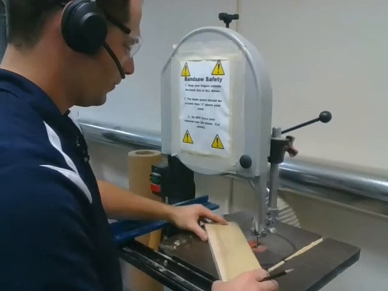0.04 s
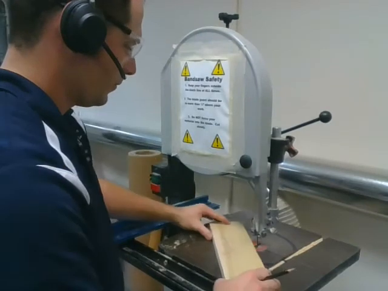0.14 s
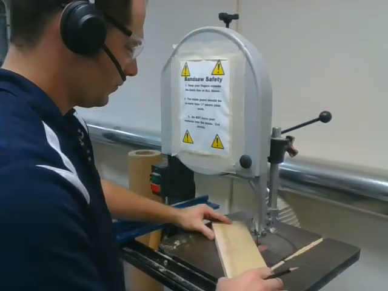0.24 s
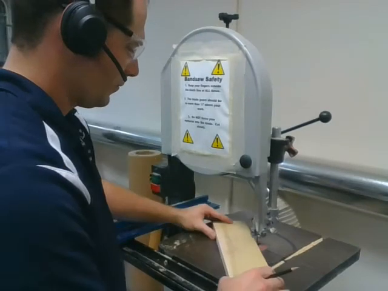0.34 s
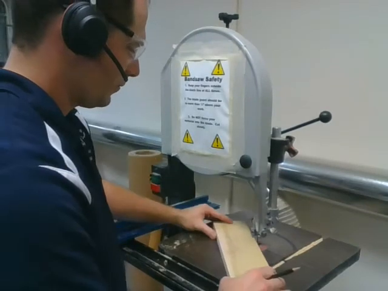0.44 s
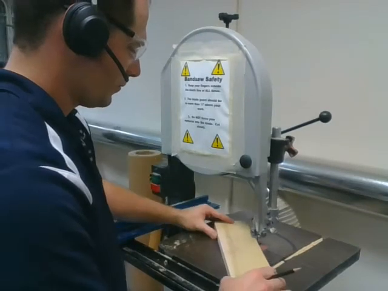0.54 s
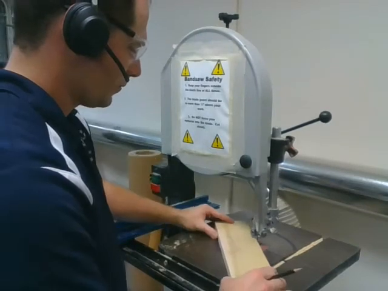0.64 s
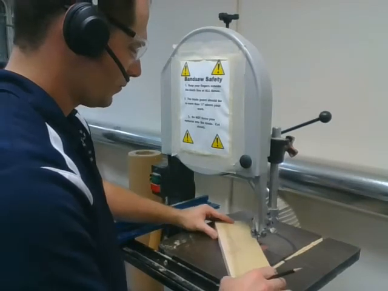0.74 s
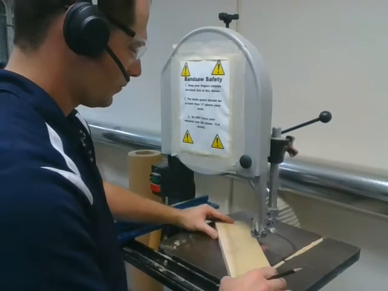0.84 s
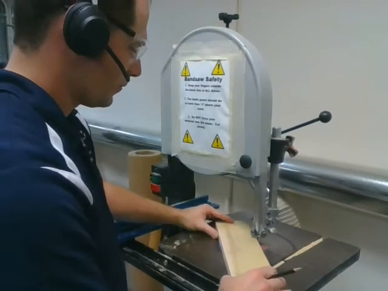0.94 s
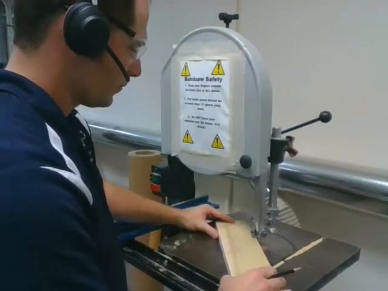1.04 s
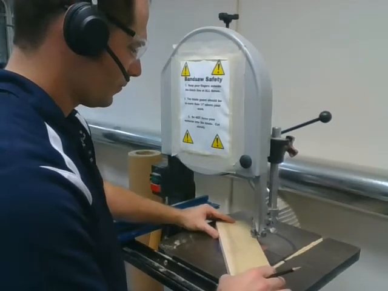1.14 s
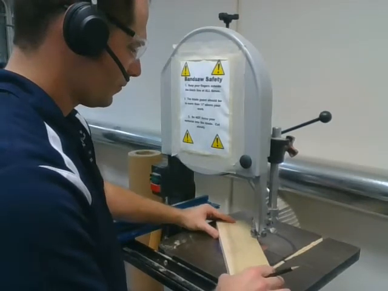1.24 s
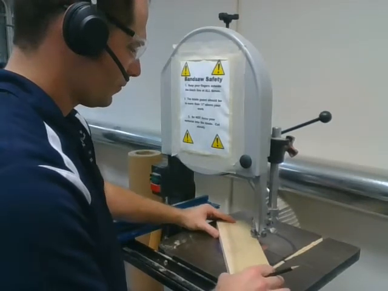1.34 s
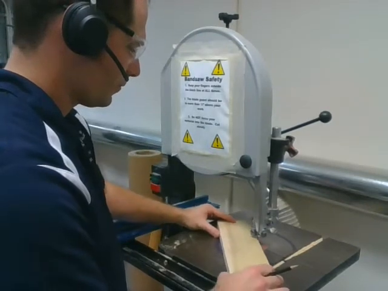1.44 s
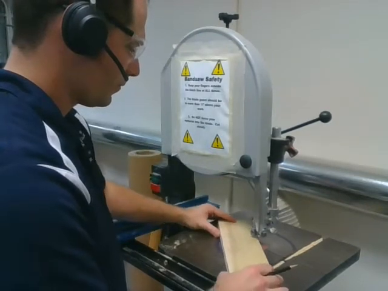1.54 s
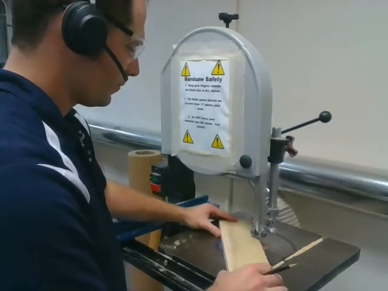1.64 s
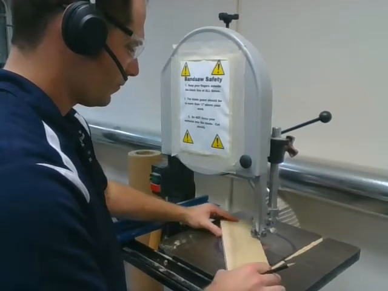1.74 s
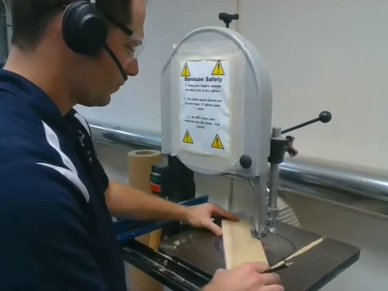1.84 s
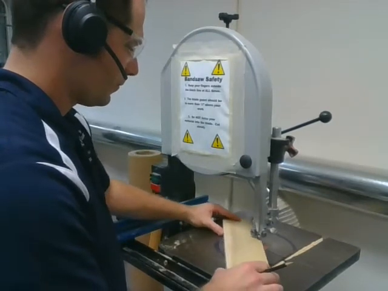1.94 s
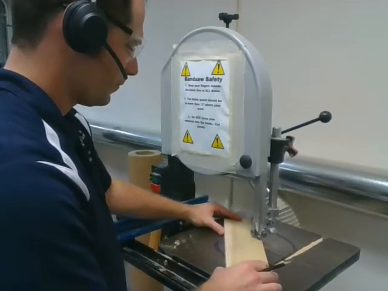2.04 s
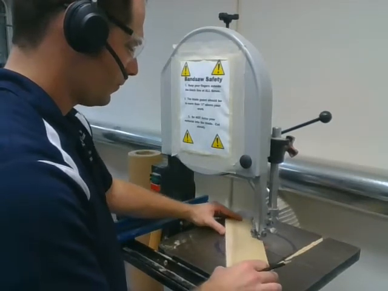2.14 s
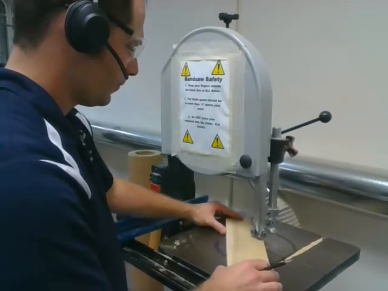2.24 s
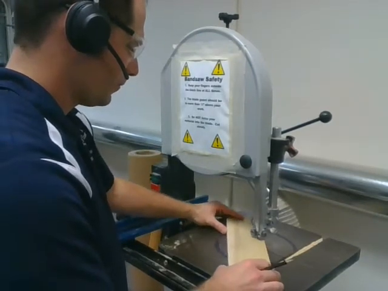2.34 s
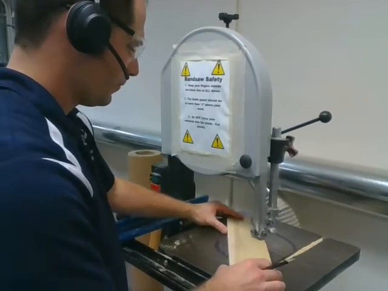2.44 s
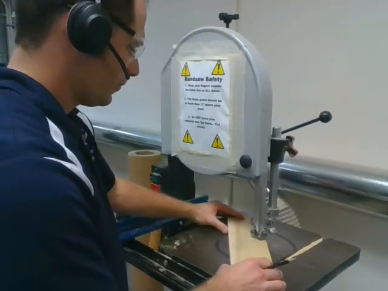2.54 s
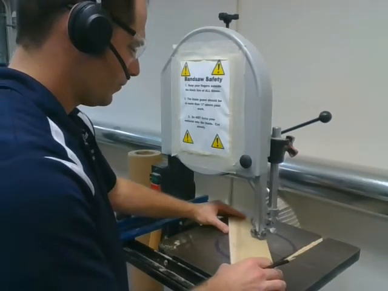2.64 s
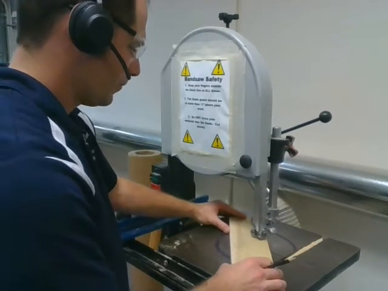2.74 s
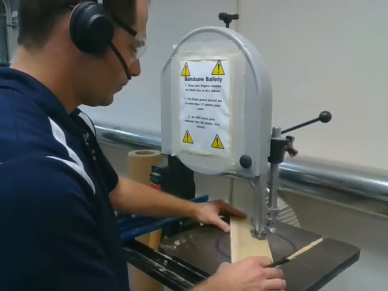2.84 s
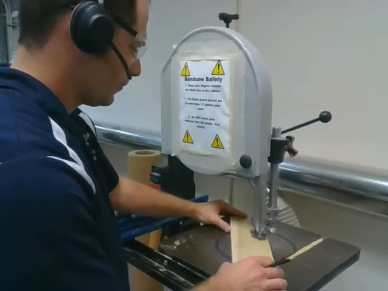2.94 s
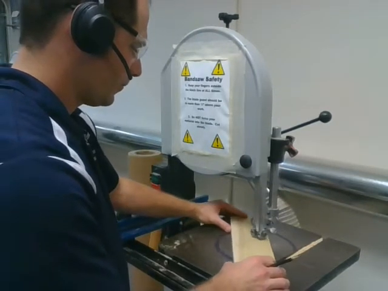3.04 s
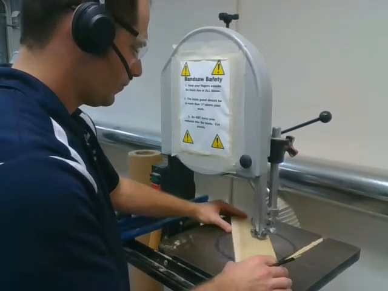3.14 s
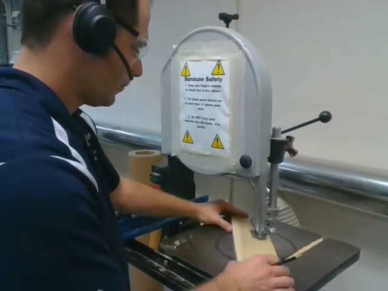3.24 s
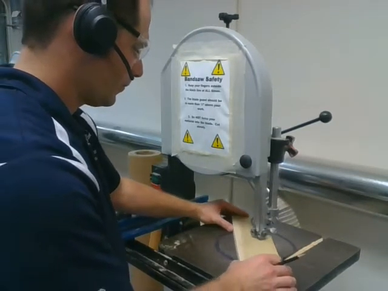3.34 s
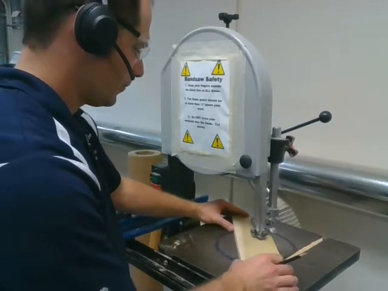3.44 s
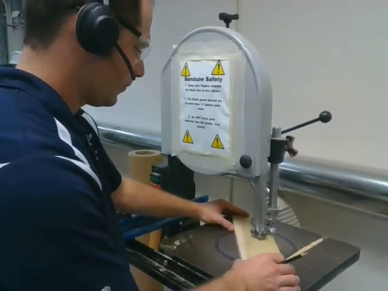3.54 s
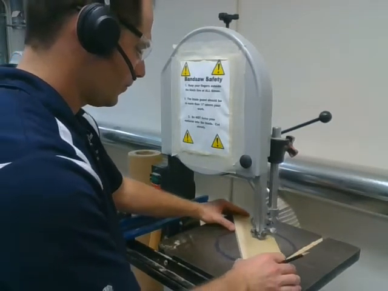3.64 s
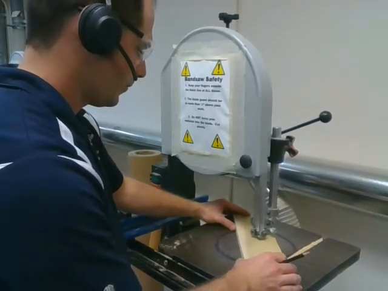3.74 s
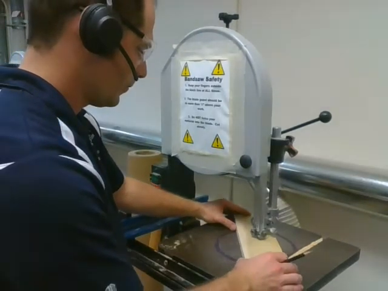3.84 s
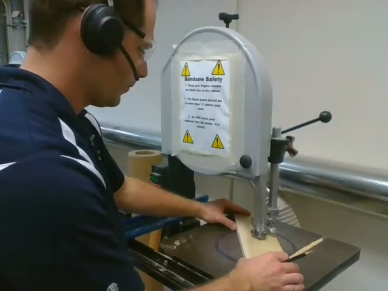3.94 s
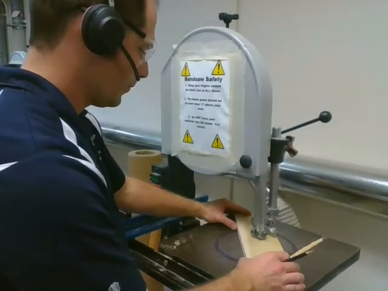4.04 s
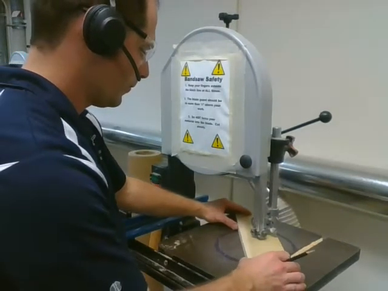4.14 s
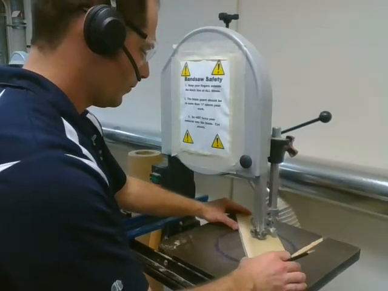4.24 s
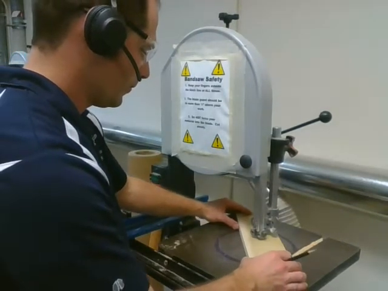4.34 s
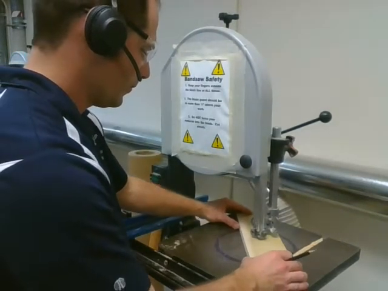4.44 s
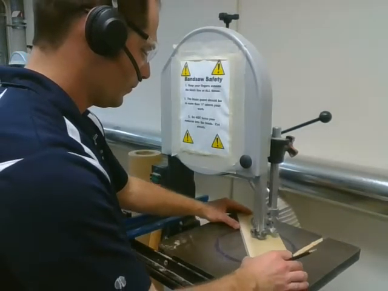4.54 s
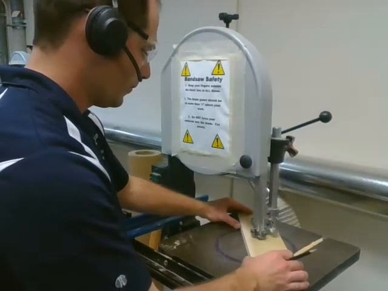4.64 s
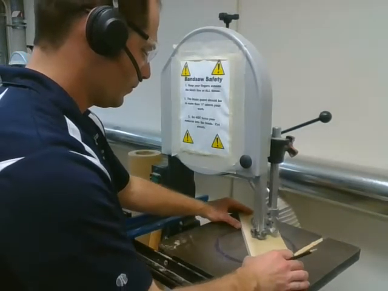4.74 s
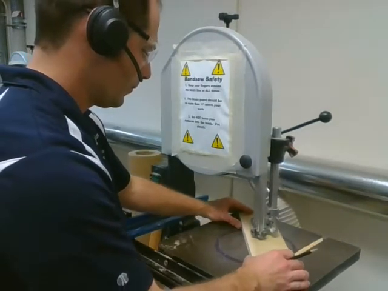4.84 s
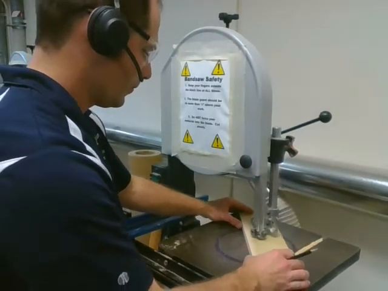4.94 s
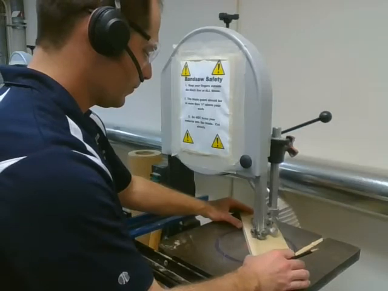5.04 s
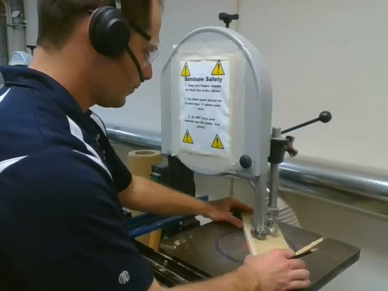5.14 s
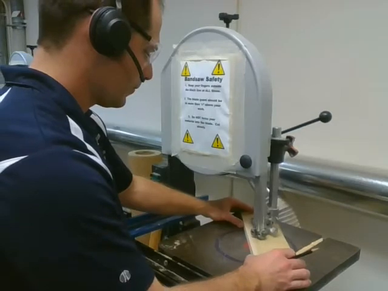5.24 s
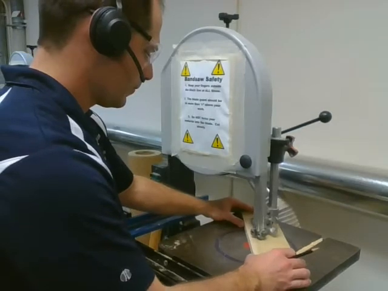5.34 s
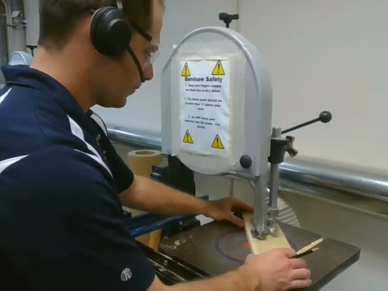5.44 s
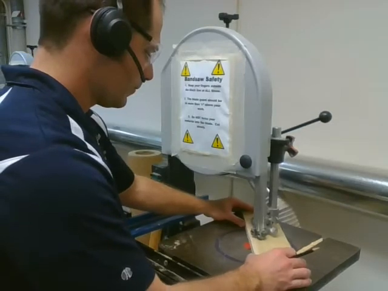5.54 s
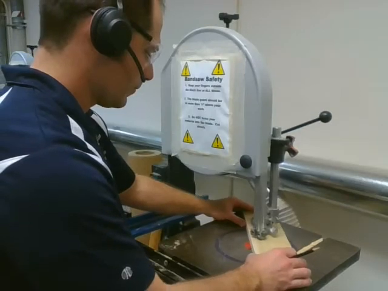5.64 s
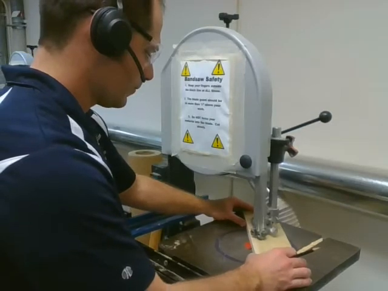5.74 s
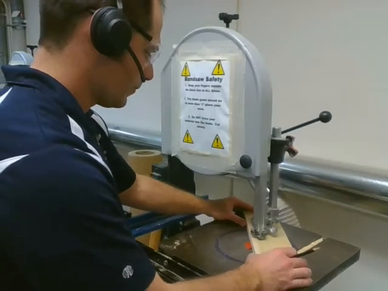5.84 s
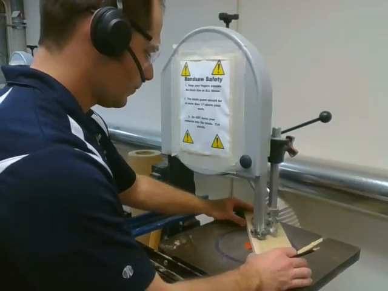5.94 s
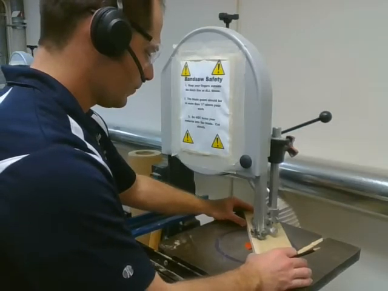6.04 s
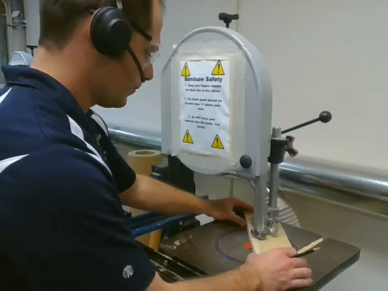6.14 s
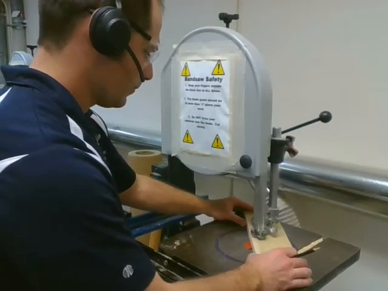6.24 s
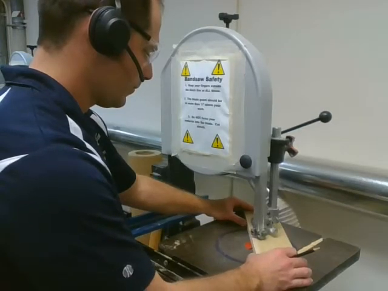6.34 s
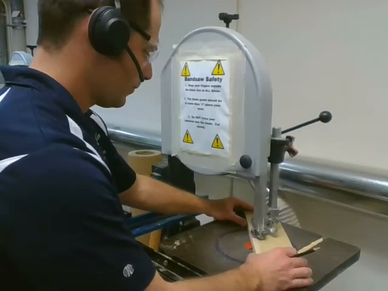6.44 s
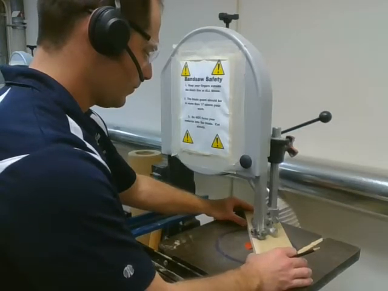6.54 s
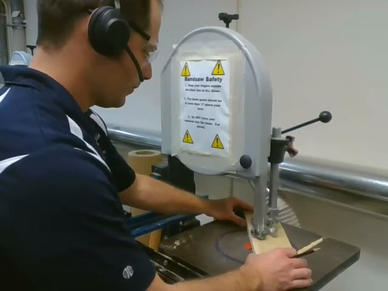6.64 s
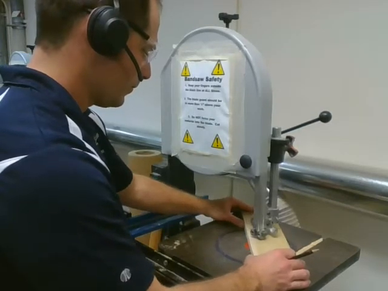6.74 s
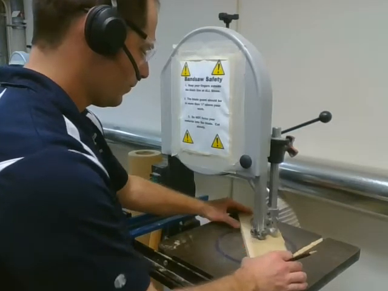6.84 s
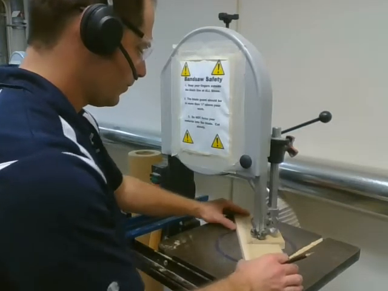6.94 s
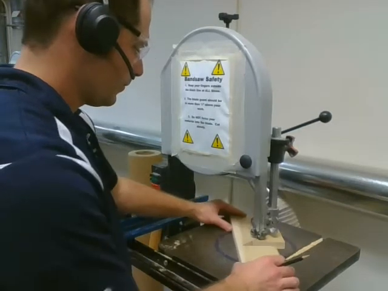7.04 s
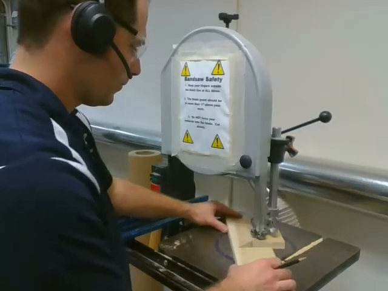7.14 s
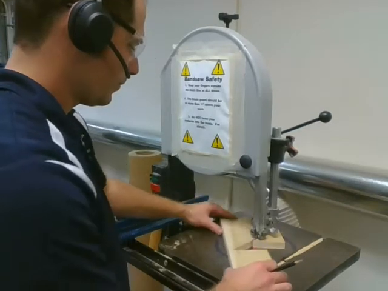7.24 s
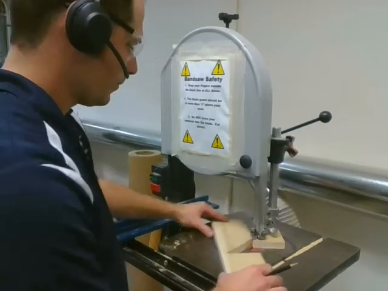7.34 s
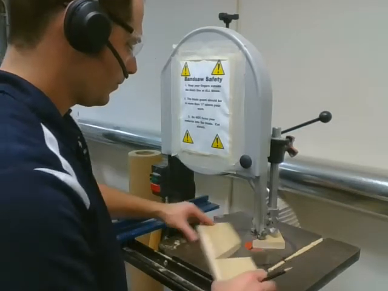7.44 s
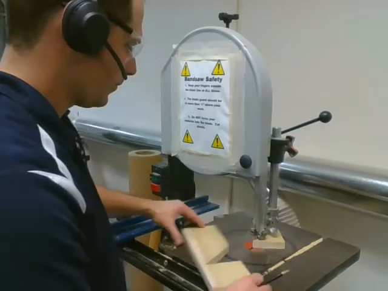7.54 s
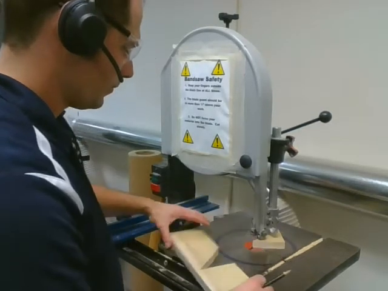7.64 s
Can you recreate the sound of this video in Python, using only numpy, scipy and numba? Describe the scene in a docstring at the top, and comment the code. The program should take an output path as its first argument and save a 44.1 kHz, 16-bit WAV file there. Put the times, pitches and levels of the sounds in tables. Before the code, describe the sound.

A small bandsaw runs in a workshop, close to a narrow-band microphone, with a very short room tail. For the first second there is only a faint, gently pulsing whirr and low motor hum. Around 1.1 s the teeth bite, growing quickly into a dense, metallic, ringing chatter. From 1.4 to 2.3 s it is loud and harsh, with sharp high screeches and dull knocks of board on table. It dips near 2.6 s, then surges again from 2.9 to 3.5 s with a fuller hum and low table drone. From 3.7 to 5.4 s the feed eases into thin, light rasping with small snags. At 5.5 s a loud, broad, hissing rip erupts, weakening after 6 s as two brief squeals sing out. From 6.6 to 7.2 s the edge scrapes free in gritty squeaks of sagging pitch; the hum continues to the end, about 7.7 s.

```python
"""A small bandsaw cuts a wooden board in a workshop, heard through a narrow-band microphone.
The machine hums: wavering tones over filtered noise, now faint, now full, to the end. At 1 s the teeth bite:
dense random clicks ring blade and board, snags screech, the board knocks on the table; then the feed eases.
At 5.5 s the blade rips loudly through the last part: broader clicks through wood and blade resonances.
It squeals on a blade mode, then scrapes free: gritty noise in a resonance of sagging pitch."""
import sys
import numpy as np
from scipy import signal
from scipy.fft import rfft, irfft, next_fast_len
from scipy.io import wavfile
from scipy.ndimage import uniform_filter1d
from numba import njit

SR = 44100
rng = np.random.default_rng(int(sys.argv[2]) if len(sys.argv) > 2 else 0)


def int16_out(signal):
    """Quantize to a 16-bit WAV file."""
    q = np.round(np.clip(np.atleast_2d(signal).T, -1, 1) * 32767)
    wavfile.write(sys.argv[1], SR, q.astype(np.int16))


N = 339761
T = np.arange(N) / SR
RIP_START_S, BLADE_FREE_S = 5.455, 6.58


def amp(db):
    """Decibels to gain."""
    return 10 ** (np.asarray(db) / 20)


def unit(x):
    """Scale to rms 1."""
    return x / np.sqrt(np.mean(x ** 2))


def controls(rows):
    """One sample-by-sample curve for each column after the time."""
    time_s, *columns = np.transpose(rows)
    return [np.interp(T, time_s, column) for column in columns]


def between(start_s, end_s, fade_s):
    """1 from start to end, with straight fades outside."""
    return np.interp(T, [start_s - fade_s, start_s, end_s, end_s + fade_s], [0, 1, 1, 0])


def held(start_s, end_s, attack_s, release_s):
    """1 from start to end, with an exponential rise before and fall after."""
    before = np.maximum(start_s - T, 0)
    after = np.maximum(T - end_s, 0)
    return np.exp(-before / attack_s - after / release_s)


def walk(rate_hz):
    """Smoothed random steps, at rms 1."""
    step = max(int(SR / rate_hz), 1)
    steps = np.repeat(rng.standard_normal(N // step + 1), step)
    return unit(uniform_filter1d(steps, step)[:N])


def tone(hz, waver, rate_hz):
    """Sine of rms 1 whose pitch wavers at random by the share waver, in steps at rate_hz."""
    turns = np.cumsum(hz * (1 + waver * walk(rate_hz))) / SR
    return np.sqrt(2) * np.sin(2 * np.pi * (turns + rng.random()))


def colour(x, points):
    """Filter by a spectrum of (frequency [Hz], gain [dB]) points, straight over log frequency."""
    hz, db = np.transpose(points)
    size = next_fast_len(N + 8192)
    bins_hz = np.maximum(np.arange(size // 2 + 1) * SR / size, 1)
    gain = amp(np.interp(np.log(bins_hz), np.log(hz), db))
    return irfft(rfft(x, size) * gain, size)[:N]


@njit
def svf(x, hz, width_hz):
    """State-variable band-pass whose centre may move."""
    y, band, low = np.empty(len(x)), 0., 0.
    for i in range(len(x)):
        g, k = np.tan(np.pi * hz[i] / SR), width_hz / hz[i]
        v = (band + g * (x[i] - low)) / (1 + g * (g + k))
        band, low, y[i] = 2 * v - band, low + 2 * g * v, k * v
    return y


def ring(x, hz, width_hz):
    """A resonance with steep skirts (two band-passes in series), at rms 1."""
    centre_hz = hz * np.ones(N)
    narrow = svf(x, centre_hz, float(width_hz))
    return unit(svf(narrow, centre_hz, 2.7 * width_hz))


def body(x, modes):
    """Several resonances driven together, at rms 1."""
    return unit(sum(amp(db) * ring(x, hz, width_hz) for hz, width_hz, db in modes))


def bursts(events, rise_s, decay_s):
    """Envelope of short blows, each swelling and dying away."""
    out = np.zeros(N)
    t = np.arange(SR // 10) / SR
    shape = (1 - np.exp(-(t / rise_s) ** 2)) * np.exp(-t / decay_s)
    for time_s, db in events:
        i = int(time_s * SR)
        out[i:i + len(t)] += amp(db) * shape / shape.max()
    return out


FLUTTER_HZ = 81.2


def teeth(rate_hz, spread_db, chatter_db, throb_db):
    """Fibres snap under the teeth in dense uneven clicks; the blade flutters and bites in bunches."""
    hits = rng.random(N) < rate_hz / SR
    snaps = hits * rng.standard_normal(N) * amp(spread_db * rng.standard_normal(N))
    chatter = chatter_db * (walk(190) + 0.64 * walk(45))
    throb = throb_db * tone(FLUTTER_HZ, 0.0086, 9.5)
    return unit(snaps * amp(chatter + throb))


# machine hum, relative: (time [s], level [dB]); also loads the table
HUM_DB = [(0, -68), (0.65, -62.5), (1.08, -69), (1.35, -57.5), (2.1, -45.5), (2.7, -51.5), (3.0, -43.5),
          (3.45, -47.5), (4.05, -57.5), (4.25, -72.5), (5.44, -77), (5.47, -48.5), (5.85, -45), (6.3, -48),
          (7.7, -47.0)]
# wheel and belt lines: (frequency [Hz], relative level [dB])
HUM_LINES_HZ_DB = [(337, -11), (495, -8.5), (541, 0.5), (633, -9.5), (678, -8.5), (720, -4), (762, -5),
                   (829, -13.5), (904, -7), (941, -13), (993, -6.5)]
# whirr spectrum: (frequency [Hz], gain [dB])
WHIRR_COLOUR = [(30, -51), (80, -42.5), (120, -35.5), (170, -33), (260, -8.5), (420, -6.5), (560, -2.5),
                (760, -4), (960, -3.5), (1200, -12), (2100, -27), (2900, -20.5), (4500, -29), (6000, -46.5)]
# blade guide resonances: (frequency [Hz], width [Hz], relative level [dB])
GUIDE_MODES = [(1406, 19, -4), (1880, 100, 0), (2470, 35, 1), (2800, 40, -6), (2990, 54, 0), (4230, 57, -5)]
# unloaded, the machine swells once in each turn of the blade
TURN_S, TURN_PEAK_S, TURN_SWELL_DB = 0.24, 0.19, 3


def machine():
    """Wheels and belt hum in wavering lines over a whirr; the blade ticks and rings in its guides."""
    hum_db, = controls(HUM_DB)
    idle = between(0, 1.0, 0.34)
    cutting = between(1.7, 5.3, 0.21)
    turn_db = TURN_SWELL_DB * np.cos(2 * np.pi * (T - TURN_PEAK_S) / TURN_S)
    swell = amp(idle * (turn_db + 1.5 * walk(16)))
    lines = sum(amp(db + 2.2 * walk(18)) * tone(hz, .006, 30) for hz, db in HUM_LINES_HZ_DB)
    lines = amp(-2 - 3.5 * cutting + 0.9 * idle) * unit(lines)
    whirr = unit(colour(rng.standard_normal(N), WHIRR_COLOUR)) * amp(2.4 * walk(50))
    whirr = amp(-2.5 - 0.92 * idle) * swell * whirr
    ticks = teeth(rate_hz=900, spread_db=-1.5, chatter_db=2.0, throb_db=-1.5)
    guides = amp(-16) * body(ticks, GUIDE_MODES)
    # the motor's low note follows half the hum's dB
    motor = amp(.5 * hum_db - 66.5) * swell * ring(rng.standard_normal(N), 119, 16)
    return amp(hum_db) * (lines + whirr + guides) + motor


DAMPED_FROM_S, DAMPED_TO_S, DAMPED_FADE_S = 2.72, 3.86, 0.49


def damping():
    """1 while the blade is in the middle of the board, 0 near its ends."""
    return between(DAMPED_FROM_S, DAMPED_TO_S, DAMPED_FADE_S)


# bite of the teeth, relative: (time [s], level [dB])
FEED_DB = [(1.0, -81), (1.13, -44.5), (1.45, -29), (2.08, -27), (2.25, -31), (2.55, -37.5), (2.8, -38.0),
           (2.93, -33), (3.45, -32), (3.7, -43.5), (4.0, -48.0), (4.6, -47.5), (5.0, -43), (5.2, -46),
           (5.44, -41.5)]
# board resonances, moving as the kerf advances: (time [s], lower mode [Hz], upper mode [Hz])
KERF_HZ = [(1.1, 2773, 3320), (2.1, 2727, 3320), (2.6, 2655, 3260), (3.5, 2650, 3360), (4.0, 2803, 3475),
           (4.4, 2956, 3450), (5.05, 2955, 3167), (5.4, 2435, 2934)]
# blade modes: (frequency [Hz], width [Hz], relative level [dB])
BLADE_MODES = [(1629, 57, -8.5), (1724, 95, -4.5), (1774, 54, 1), (1896, 26, -9.5), (1360, 360, -20),
               (929, 21, -23.5), (3760, 40, -29), (5680, 50, -27)]
# rasp spectrum: (frequency [Hz], gain [dB])
RASP_COLOUR = [(60, -52.5), (300, -42), (800, -14.5), (1150, -5.5), (1400, 2.5), (2100, 7.5), (3000, 3),
               (3900, -6), (4500, -27), (7000, -33.5)]
# dust hiss spectrum: (frequency [Hz], gain [dB])
DUST_COLOUR = [(2500, -40), (3900, -2.5), (4500, 6), (5400, 2.5), (5720, -1), (6000, -7), (6700, -7),
               (8000, -44)]
# thin whistles in the kerf: (start [s], end [s], frequency [Hz], level [dB])
WHISTLES = [(2.807, 3.351, 5326, -58), (4.447, 5.455, 4690, -62.5)]
FULL_BITE_DB, DUST_DB_PER_FEED_DB = -30, 0.45
# the blade rings most while the board is steered against it
STEER_FROM_S, STEER_TO_S, STEER_FADE_S, STEER_DB = 2.47, 3.12, 0.45, 5.5


def first_cut():
    """The chattering teeth ring blade and board; dust hisses and whistles out of the kerf."""
    feed_db, = controls(FEED_DB)
    lower_hz, upper_hz = controls(KERF_HZ)
    over_bite_db = feed_db - FULL_BITE_DB
    damped = damping()
    steer = between(STEER_FROM_S, STEER_TO_S, STEER_FADE_S)
    force = teeth(rate_hz=14000, spread_db=1.5, chatter_db=2.5, throb_db=1.75)
    chips = teeth(rate_hz=14000, spread_db=2.5, chatter_db=3.0, throb_db=0.0)
    blade = amp(-8.5 + STEER_DB * steer) * body(force, BLADE_MODES)
    # a lower blade mode joins in midway through the first cut
    blade += amp(-10) * between(2.78, 3.38, 0.14) * ring(force, 1596, 60)
    board = amp(-4.5 + 0.69 * damped) * ring(force, lower_hz, 260)
    board += amp(-4.5 - 20 * damped ** 2) * ring(force, upper_hz, 260)
    # a light bite rasps more and rings less
    rasp = unit(colour(force + 0.6 * chips, RASP_COLOUR))
    rasp *= amp(-11.5 - 0.38 * over_bite_db + 2.1 * damped)
    dust = unit(colour(chips + 2.5 * force, DUST_COLOUR))
    dust *= amp(-50 + DUST_DB_PER_FEED_DB * over_bite_db - 5.3 * damped)
    dust *= between(1.46, RIP_START_S, 0.68)
    whistles = sum(amp(db) * between(start_s, end_s, 0.38) * ring(force, hz, 280)
                   for start_s, end_s, hz, db in WHISTLES)
    cut = amp(feed_db) * (blade + board + rasp) + dust + whistles
    return cut * between(1.08, RIP_START_S, 0.11)


# board knocks on the table: (time [s], relative peak [dB])
KNOCKS = [(1.501, -36), (1.649, -39.5), (1.713, -31.5), (1.998, -38.5), (2.069, -31.5), (2.193, -41)]
# table rumble spectrum: (frequency [Hz], gain [dB])
RUMBLE_COLOUR = [(25, -25), (60, -19.5), (95, -13), (120, 3.5), (150, -7), (200, -2), (260, 7.5), (330, 8),
                 (500, -32)]
# knock spectrum: (frequency [Hz], gain [dB])
KNOCK_COLOUR = [(25, -31), (70, -7.5), (130, 7), (300, 6), (500, 2), (900, 2), (1400, -17.5), (4000, -52)]
# table resonance, mid-cut
DRONE_HZ, DRONE_DB, DRONE_FROM_S, DRONE_TO_S = 333.3, -49.5, 2.86, 3.7


def table():
    """The saw table rumbles with the loaded machine, drones and takes the knocks of the board."""
    hum_db, = controls(HUM_DB)
    rip_db, = controls(RIP_DB)
    shake = teeth(rate_hz=2600, spread_db=5.5, chatter_db=-3.5, throb_db=1.5)
    cut_load = amp(hum_db - 11) * between(1.72, 5.4, 0.55)
    rip_load = amp(rip_db - 34.5)
    load = np.where(T < RIP_START_S, cut_load, rip_load)
    rumble = load * unit(colour(shake, RUMBLE_COLOUR))
    sway = unit(tone(DRONE_HZ, .02, 60) + .7 * ring(shake, DRONE_HZ, 50))
    drone = amp(DRONE_DB) * sway * held(DRONE_FROM_S, DRONE_TO_S, 0.25, 0.44)
    drone *= between(2.55, 4.85, 0.12)
    blows = bursts(KNOCKS, rise_s=0.0019, decay_s=0.0059) * rng.standard_normal(N)
    return rumble + drone + amp(10) * colour(blows, KNOCK_COLOUR)


def screech(time_s, db, hz):
    """Each snag or slip is a brief screech of one mode, with a splintering crack and a ring of the blade."""
    latest = np.maximum(np.searchsorted(time_s, T, side="right") - 1, 0)
    jerk = bursts(zip(time_s, db), rise_s=0.002, decay_s=0.0032)
    crack = amp(-16) * unit(colour(rng.standard_normal(N), RASP_COLOUR))
    crack += amp(-22) * unit(colour(rng.standard_normal(N), DUST_COLOUR))
    blade_hz = BLADE_MODES[2][0]  # the strongest mode
    blade = amp(-16) * tone(blade_hz, 0.0199, 300)
    blade *= bursts(zip(time_s, db), rise_s=0.0013, decay_s=0.0078)
    return amp(-7.5) * (jerk * (tone(hz[latest], 0.02756, 700) + crack) + blade)


# hard snags of the teeth, and at the end three slips of the scraping edge:
# (time [s], relative peak [dB], frequency [Hz])
SNAGS_AND_SLIPS = [(1.1843, -25.5, 3270), (1.3933, -15, 3273), (1.501, -10.5, 3353), (1.5429, -13.5, 3328),
                   (1.5516, -13, 3270), (1.6487, -11.5, 3316), (1.7111, -8, 3310), (1.7624, -15.5, 3300),
                   (1.9959, -17, 3339), (2.0436, -11.5, 3272), (2.0557, -19, 3560), (2.0674, -11.5, 3360),
                   (2.1216, -15.5, 3360), (2.1918, -17.5, 3295), (2.2543, -24, 1760), (2.29, -20, 1780),
                   (2.9248, -17.5, 2620), (3.0281, -23, 2660), (3.2385, -18.5, 1734), (3.3513, -17.5, 2770),
                   (3.6868, -23, 2600), (3.8833, -31, 2830), (4.5625, -32.5, 3030), (5.032, -29.5, 2930),
                   (5.6357, -15.5, 1788), (7.1038, -24, 2640), (7.1896, -29, 2715), (7.204, -23, 2770)]
SMALL_SNAGS_PER_S = 9
SMALL_SNAG_OVER_BITE_DB, SMALL_SNAG_SPREAD_DB = 8, 1.5


def snags_and_slips():
    """Hard snags, late slips of the edge, and small random snags that follow the bite on the free board mode."""
    feed_db, = controls(FEED_DB)
    lower_hz, upper_hz = controls(KERF_HZ)
    struck = rng.random(N) < SMALL_SNAGS_PER_S / SR
    at = np.flatnonzero(struck & (T > SNAGS_AND_SLIPS[0][0]) & (T < RIP_START_S))
    db = feed_db + SMALL_SNAG_OVER_BITE_DB + SMALL_SNAG_SPREAD_DB * rng.standard_normal(N)
    hz = np.where(damping() > .5, lower_hz, upper_hz)
    return screech(*np.transpose(SNAGS_AND_SLIPS)) + screech(T[at], db[at], hz[at])


# tearing in the final rip, relative: (time [s], level [dB]); also loads the table
RIP_DB = [(5.47, -29), (5.7, -27.5), (5.9, -29), (6.1, -35.5), (6.5, -37), (6.68, -46.5), (7.15, -49),
          (7.4, -56.5)]
# loose blade modes: (frequency [Hz], width [Hz], relative level [dB])
RIP_BLADE_MODES = [(1799, 52, -1.5), (1870, 76, -5.5), (1700, 91, -8.5)]
# wood resonances: (frequency [Hz], width [Hz], relative level [dB])
RIP_WOOD_MODES = [(1340, 120, -6), (1610, 236, -0.5), (2404, 160, -2), (2890, 850, -1.5), (4617, 330, -5.5)]
# tearing spectrum: (frequency [Hz], gain [dB])
RIP_COLOUR = [(50, -49), (300, -32.5), (900, -5), (1300, -6), (2100, 1.5), (2450, 0.5), (3000, 0),
              (3700, -3), (4300, -13.5), (6500, -22)]
# hiss spectrum: (frequency [Hz], gain [dB])
RIP_DUST_COLOUR = [(2500, -25.5), (4000, 3.5), (4700, 6.5), (5700, 5), (6200, 2.5), (6900, -4.5),
                   (8000, -31)]
DUST_BUILD_S = 0.43


def rip():
    """Pushed hard, the teeth tear broadly; the wood rings most under load, and the hiss builds up."""
    rip_db, = controls(RIP_DB)
    force = teeth(rate_hz=12000, spread_db=2.3, chatter_db=1.57, throb_db=0.7)
    load = amp(0.8 * (rip_db - rip_db.max()))
    wood = amp(-3.0) * unit(colour(force, RIP_COLOUR))
    wood += amp(-2.0) * load * body(force, RIP_WOOD_MODES)
    # loose ringing gives way while the blade squeals, and stops once it is free
    loose = (1 - 0.68 * between(6.08, BLADE_FREE_S, 0.09)) * between(0, BLADE_FREE_S, 0.11)
    blade = amp(-4) * loose * body(force, RIP_BLADE_MODES)
    build = np.clip((T - RIP_START_S) / DUST_BUILD_S, 0, 1)
    dust = amp(-14 + 6.35 * build) * unit(colour(force, RIP_DUST_COLOUR))
    onset = np.clip((T - RIP_START_S) / 0.0055, 0, 1)
    return amp(rip_db) * (wood + blade + dust) * onset


# squeals as the blade leaves the wood:
# (start [s], end [s], release [s], frequency [Hz], relative level [dB])
SQUEALS = [(6.116, 6.135, 0.01, 1885, -31), (6.262, 6.35, 0.1, 1870, -34.5)]
SQUEAL_ATTACK_S = 0.095


def squeal():
    """One blade mode sings in two spells as the kerf opens: the first breaks off, the second fades."""
    quiver = amp(1.2 * walk(70))
    spells = sum(amp(db) * held(start_s, end_s, SQUEAL_ATTACK_S, release_s) * tone(hz, .006, 90)
                 for start_s, end_s, release_s, hz, db in SQUEALS)
    return quiver * spells


# cut edge scraping along the blade: (start [s], end [s], relative level [dB])
SCRAPES = [(6.802, 6.885, -44.5), (6.962, 7.206, -44.5)]
SCRAPE_HZ, SCRAPE_SAG_HZ_PER_S = 2925, 530


def scrape():
    """The sawn edge rubs the side of the blade, then sticks and slips in gritty squeaks; the pitch sags."""
    hz = SCRAPE_HZ - SCRAPE_SAG_HZ_PER_S * np.clip(T - SCRAPES[0][0], 0, 1)
    slips = rng.standard_normal(N) * amp(5 * tone(125, .15, 40))
    squeak = ring(slips, hz, 160) + amp(-17) * unit(colour(slips, RIP_DUST_COLOUR))
    rub = amp(-56) * between(BLADE_FREE_S, SCRAPES[-1][1], 0.03)
    stick_slip = sum(amp(db) * held(start_s, end_s, 0.011, 0.005) for start_s, end_s, db in SCRAPES)
    return squeak * (rub + stick_slip)


def workshop(x, t60_s, wet_db):
    """Near walls add a short diffuse tail: noise decaying by 60 dB in t60_s."""
    t = np.arange(SR // 2) / SR
    tail = rng.standard_normal(len(t)) * amp(-60 * t / t60_s) * (t > .004)
    return x + amp(wet_db) * signal.fftconvolve(x, tail / np.linalg.norm(tail))[:N]


def scene():
    """Saw and board in the room, with the machine direct."""
    sawing = first_cut() + table() + snags_and_slips() + rip() + squeal() + scrape()
    return (machine() + workshop(sawing, t60_s=0.18, wet_db=-11.0))[None]


# mirror image spectrum: (frequency [Hz], gain [dB])
IMAGE_COLOUR = [(8000, -23), (9200, -23.5), (10300, -45), (11300, -46), (13000, -56), (14300, -50.5),
                (15500, -64.5)]
BAND_HZ, CONVERTER_HZ, TOP_HZ = 7000, 16000, 15600


def record(dry):
    """The microphone passes a narrow band; its converter leaks a faint mirror image above it."""
    thin = signal.sosfilt(signal.butter(2, 65, "high", fs=SR, output="sos"), dry[0])
    narrow = signal.sosfilt(signal.ellip(7, .3, 60, BAND_HZ, fs=SR, output="sos"), thin)
    image = colour(2 * narrow * np.cos(2 * np.pi * CONVERTER_HZ * T), IMAGE_COLOUR)
    top = signal.ellip(8, .2, 70, TOP_HZ, fs=SR, output="sos")
    return signal.sosfilt(top, narrow + image)[None]


dry = scene()
out = record(dry)
int16_out(out)
```